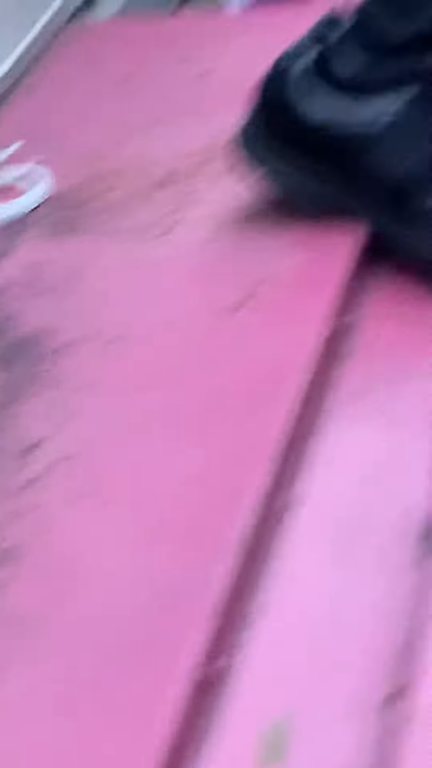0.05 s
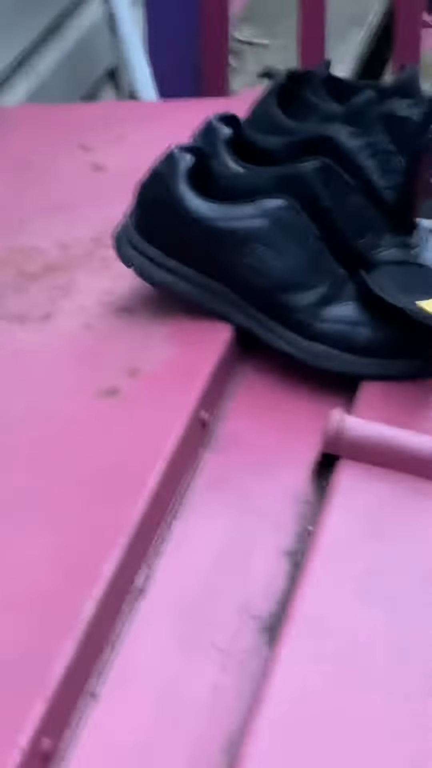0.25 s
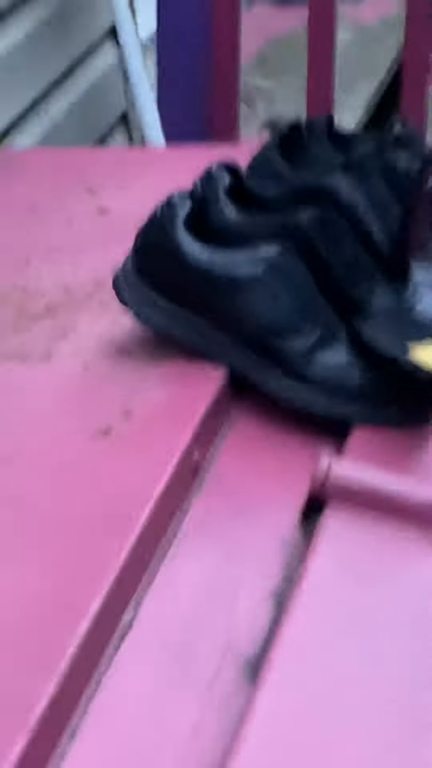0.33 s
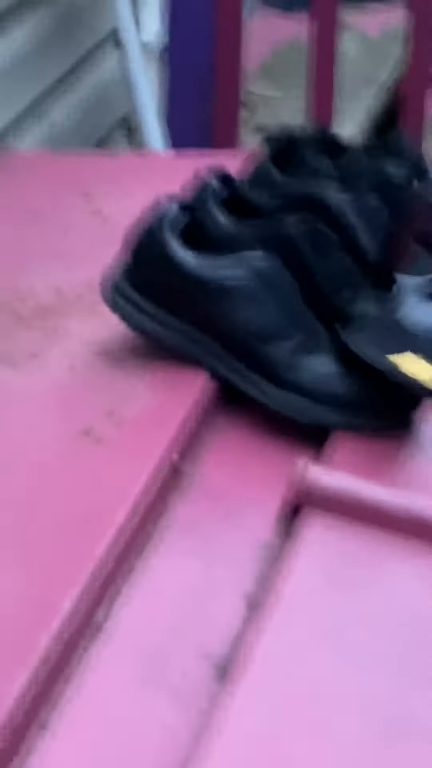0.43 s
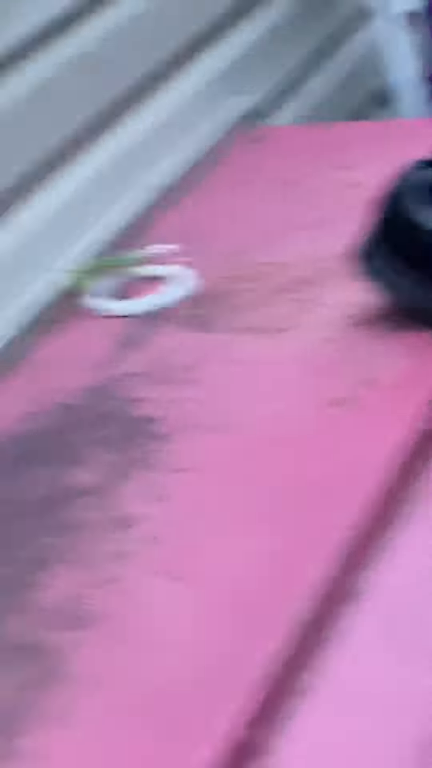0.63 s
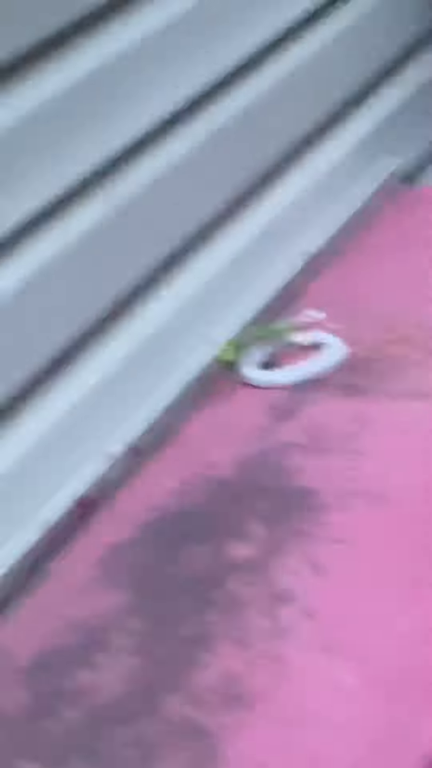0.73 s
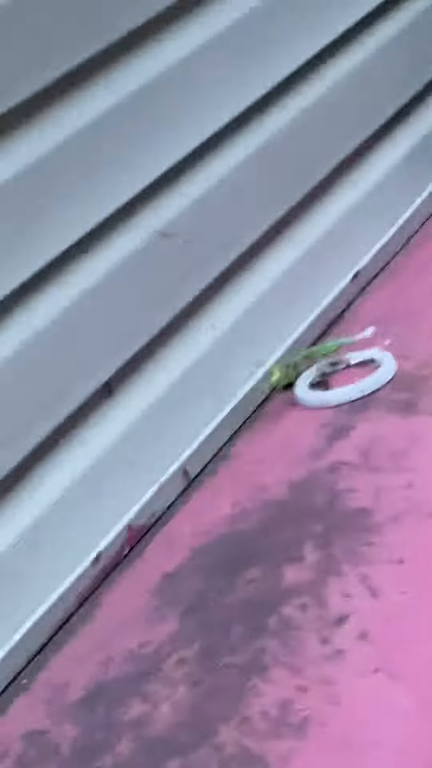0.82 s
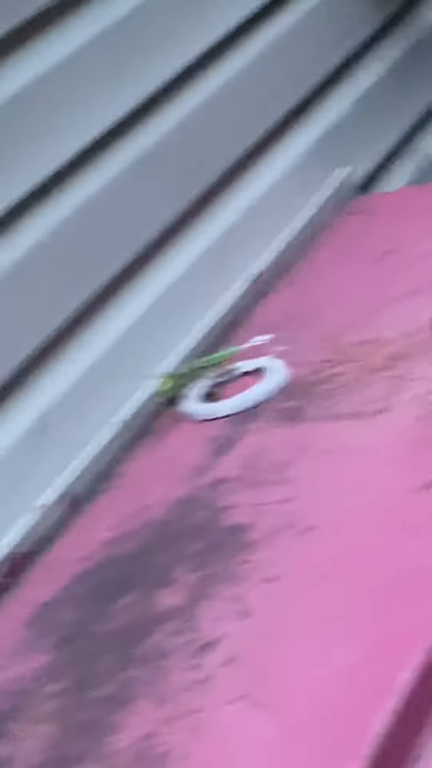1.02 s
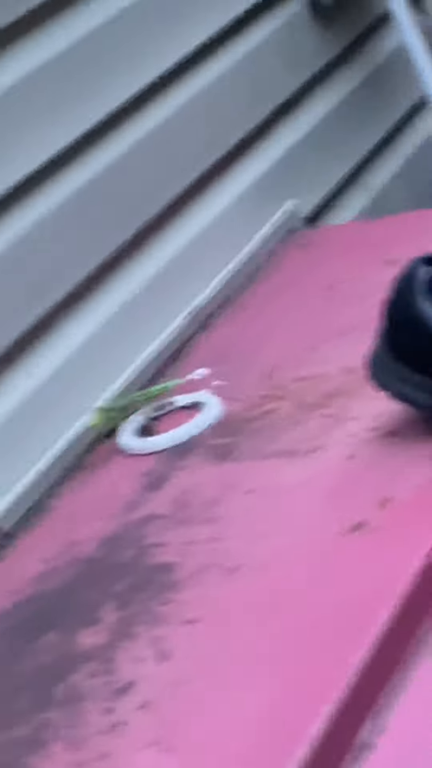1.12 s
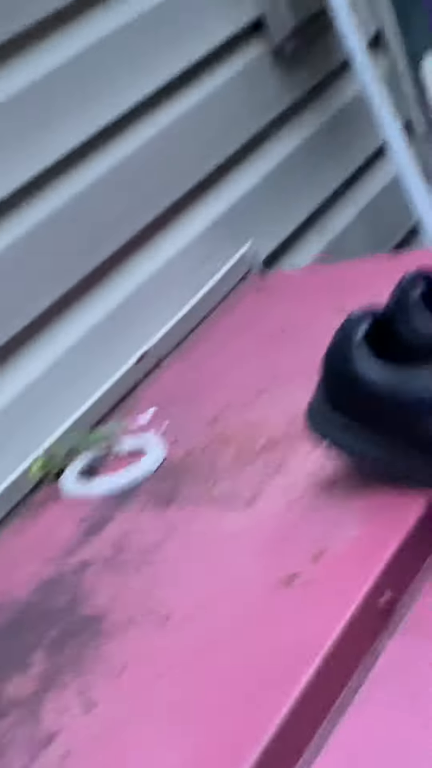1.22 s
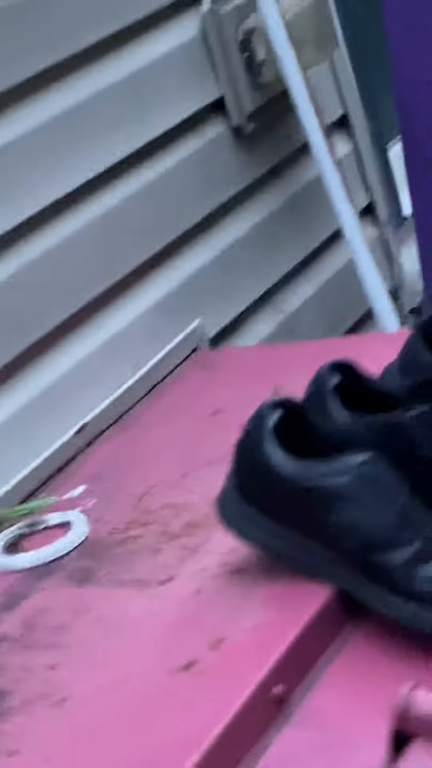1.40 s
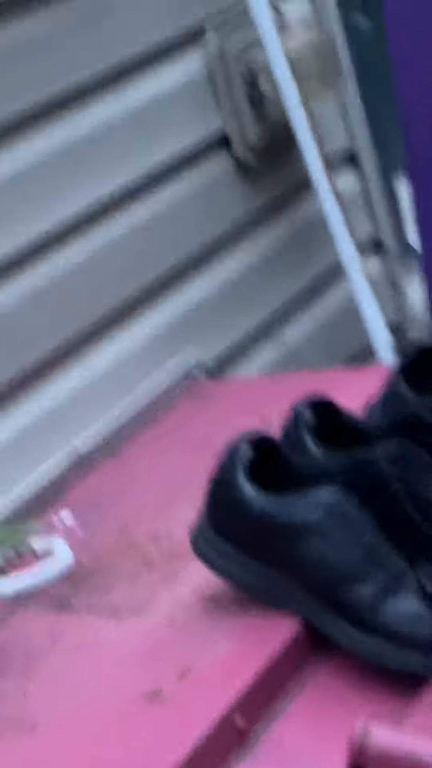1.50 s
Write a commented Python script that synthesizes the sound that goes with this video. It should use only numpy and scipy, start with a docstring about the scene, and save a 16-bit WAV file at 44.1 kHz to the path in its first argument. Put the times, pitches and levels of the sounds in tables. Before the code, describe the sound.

Camera handling thumps and a short finger rub, over a faint outdoor insect hiss.

```python
"""Handling a small camera outdoors

A hand shifts its grip: a few hollow knocks and a short rub travel through the case to the microphone.
Each impact gives a dull pock, a bright click, a brief ring and a low wobble of the whole body.
The fingers rub by stick-slip friction, scuff, and judder to a stop; the moving camera is softly buffeted.
Behind it are a faint hiss of insects, thin outdoor air and a distant rumble."""
import sys
import numpy as np
from scipy import signal
from scipy.fft import rfft, irfft
from scipy.io import wavfile

SR = 44100
rng = np.random.default_rng(int(sys.argv[2]) if len(sys.argv) > 2 else 0)


def wav_out(sig):
    """Save sig, one row per channel (or a flat mono array), as 16-bit PCM at SR to the path in sys.argv[1]."""
    wavfile.write(sys.argv[1], SR, np.round(np.clip(np.atleast_2d(sig).T, -1, 1) * 32767).astype(np.int16))


N = 68355

# distant rumble: frequency_hz, relative_db
RUMBLE_SPECTRUM = [(20, -40.5), (50, -5), (90, 1), (130, -3.5), (185, 1.5), (260, -11), (380, -18.5),
                   (800, -48.5), (4000, -70)]
# outdoor air: frequency_hz, relative_db
AIR_SPECTRUM = [(60, -7), (400, -6.5), (1000, 1.5), (1800, 0.5), (2600, -2.5), (3800, -5.5), (6300, -2),
                (8000, -19), (12000, -31.5)]
# rise and fall of the air: time_s, level_db
AIR_ENVELOPE = [(0, -65.5), (.55, -62.5), (.68, -61), (.87, -63.5), (.97, -62.5), (1.08, -66.5),
                (1.33, -67.5), (1.38, -61.5), (1.55, -62.5)]
# fizz in the top treble: frequency_hz, relative_db
FIZZ_SPECTRUM = [(3000, -42), (6000, -7), (8000, 6), (10000, 3), (12300, -1), (14000, -5.5), (15200, -14),
                 (15700, -19.5)]
# rise and fall of the fizz: time_s, relative_db
FIZZ_ENVELOPE = [(0.0, -83), (0.102, -77.5), (0.146, -71), (0.272, -75.5), (0.378, -71.5), (0.392, -67.5),
                 (0.4, -71), (0.47, -68), (0.586, -75), (0.79, -66.5), (0.872, -73.5), (1.308, -79.5),
                 (1.416, -67), (1.55, -73.5)]
# insect chorus: frequency_hz, relative_db
INSECT_SPECTRUM = [(2000, -63), (4000, -33.5), (4900, -12.5), (5600, -6), (5880, 4.5), (6100, -4.5),
                   (6650, -1.5), (7300, -23.5), (8200, -25.5), (11000, -48)]
# rise and fall of the chorus: time_s, level_db
INSECT_ENVELOPE = [(0, -55.5), (.11, -55.5), (.16, -59), (.75, -58), (1.25, -58), (1.55, -57.5)]
# phase of distant sound between the microphone ports: frequency_hz, left_lead_rad
PORT_PHASE_LEAD = [(0, 0), (700, -.15), (1400, -.6), (2400, .5), (3200, 0), (5000, .25), (6000, 1.6),
                   (7400, 3.1), (8600, 4.3), (10200, 6.2), (11200, 6.5), (12200, 8.1), (13500, 9.4),
                   (15500, 10.4)]
# buffeting of the moving camera: frequency_hz, relative_db
BUFFET_SPECTRUM = [(20, -34), (45, -7.5), (80, -3.5), (140, -6.5), (250, -19), (600, -52), (2000, -91.5)]
# strength of the buffeting: time_s, level_db
BUFFET_ENVELOPE = [(0, -49.5), (.12, -75.5), (.18, -59.5), (.28, -40.5), (.36, -57), (.43, -37.5),
                   (.53, -34.5), (.58, -54), (.66, -58), (.84, -54.5), (1.05, -70), (1.55, -68.5)]
# friction of the fingers: time_s, level_db
RUB_ENVELOPE = [(0, -61), (.04, -64), (.06, -52), (.11, -68.5), (.128, -58), (.14, -28), (.16, -36.5),
                (.185, -44.5), (.24, -39.5), (.275, -44), (.32, -51.5), (.365, -53.5), (.41, -44.5),
                (.435, -43), (.46, -38), (.495, -32.5), (.515, -21), (.535, -65), (.6, -74), (.68, -76.5),
                (.86, -75), (.96, -67.5), (1.06, -84.5), (1.34, -90), (1.385, -72), (1.44, -98)]
# a soft blow through the case: frequency_hz, relative_db
POCK_SPECTRUM = [(30, -38), (130, -16.5), (210, -15.5), (310, -8), (430, -2), (560, 1), (680, -5.5),
                 (850, -14.5), (1000, -34), (1600, -41.5), (2500, -60.5), (4000, -75.5), (9000, -91)]
# a hard contact: frequency_hz, relative_db
CLICK_SPECTRUM = [(40, -28), (400, -11), (800, 12), (1500, 1.5), (1900, -7), (3300, -14.5), (4200, -26),
                  (5600, -12.5), (7200, -43.5), (9000, -41.5), (11500, -60.5), (15000, -80.5)]
# knocks on the case: start_s, pock_db, click_db, ring_db, wobble_db
IMPACTS = [(.0505, -41.5, -47.5, -76.5, -67.5), (0.1438, -2, -50.5, -35.5, -48),
           (0.1501, -1, -33, -36.5, -34), (0.1725, -35, -61.5, -61, -34.5), (0.1923, -23, -30.5, -58, -56),
           (0.2182, -43, -58, -53, -60), (0.232, -31.5, -58, -59.5, -55), (0.2484, -49.5, -51, -34.5, -49),
           (0.2516, -16.5, -26.5, -55, -46), (0.2579, -20, -40, -54, -43.5),
           (.3850, -14.5, -58.5, -43, -61.5), (0.3904, -1.5, -11, -16, -28.5),
           (.3920, -11.5, -48, -29.5, -42), (0.3969, -19, -44.5, -36, -34.5),
           (.4160, -24.5, -46.5, -35.5, -46), (.4548, -25.5, -63, -49, -66.5), (0.477, -31, -61, -67, -48),
           (0.4962, -28.5, -51, -55, -57), (.5122, -24.5, -42, -23, -20), (.5690, -45.5, -69.5, -58, -51),
           (.6550, -60, -53.5, -54.5, -62), (.6970, -56.5, -59.5, -59, -71), (.7260, -61, -54, -59, -61)]
# resonances of the case: pitch_hz, relative_db, t60_s
RING_MODES = [(505, -20, .04), (810, -18.5, .018), (1022, -8.5, 0.044), (1400, -24.5, .014),
              (1545, -2, .017), (3300, -40, 0.039)]
# dry scuffs of skin: centre_s, half_width_s, level_db
SCUFF_STROKES = [(0.25, 0.0038, -54), (0.45, 0.0091, -49.5), (0.476, 0.017, -50), (0.5141, .007, -36.5)]
# sliding skin: frequency_hz, relative_db
SCUFF_SPECTRUM = [(200, -24.5), (1000, 8), (1700, 1.5), (2500, -13.5), (3400, -8), (4300, -15),
                  (5700, -6.5), (7200, -26.5), (9800, -23.5), (13000, -50.5)]

RUMBLE_DB, FIZZ_GAIN_DB = -58, 2.5
CRICKET_HZ, CRICKET_SKIRT_HZ, CRICKET_DB = 2210, 186, -72.5
SLIPS_PER_S, SLIP_SPREAD_DB, RUB_GRIT_DB = 900, 5, -13.5
POCK_DELAY_S, POCK_SKEW = .0019, .12  # the push comes just after contact and ebbs slower than it swells
HARD_PAN_DB = [[3], [-3]]  # left, right: hard contact is nearer the left port
WOBBLE_HZ, WOBBLE_T60_S, WOBBLE_RISE_S = 80, .11, .006
JUDDER_CENTRE_S, JUDDER_HALF_WIDTH_S, JUDDER_JITTER_S = .510, .007, .00014
JUDDER_HZ, JUDDER_GLIDE_HZ_PER_S = 508, 1800
JUDDER_POCK_DB, JUDDER_CLICK_DB, JUDDER_RING_DB = -18, -29, -35
SCATTER_DB, SCATTER_T60_S, SCATTER_LOW_HZ, SCATTER_DELAY_S = -14, .019, 200, .004
CEILING, CUTOFF_HZ = .98, 15700


def amp(db):
    """Amplitude grows tenfold for every 20 dB."""
    return 10 ** (np.asarray(db) / 20)


def unit(x):
    """Normalisation to an rms of one."""
    return x / np.sqrt(np.mean(x ** 2) + 1e-20)


def colour(points, hz):
    """Interpolation on a log-frequency axis."""
    frequencies, values = np.transpose(points)
    return np.interp(np.log(hz + 1), np.log(frequencies + 1), values)


def level(points):
    """Amplitude envelope, linear in decibels between points."""
    return amp(np.interp(np.arange(N) / SR, *np.transpose(points)))


def response(points, skew=1, size=4096):
    """Centred impulse response of a spectrum, peak one; skew 0 is symmetric, 1 is minimum phase."""
    log_gain = np.log(amp(colour(points, abs(np.fft.fftfreq(size, 1 / SR)))))
    phase = -skew * signal.hilbert(log_gain).imag
    pulse = np.fft.fftshift(np.fft.ifft(np.exp(log_gain + 1j * phase)).real)
    return pulse / abs(pulse).max()


def through(x, impulse_response, start=0):
    """Convolution with an impulse response whose time zero is at sample start."""
    return signal.fftconvolve(x, impulse_response)[start:start + N]


def noise(points, correlation):
    """Spectrally shaped stereo noise; the balance of mid and side sets the left-right correlation."""
    gain = amp(colour(points, np.fft.rfftfreq(N, 1 / SR)))
    mid, side = irfft(rfft(rng.standard_normal((2, N))) * gain, N)
    mid, side = mid * np.sqrt(1 + correlation), side * np.sqrt(1 - correlation)
    return unit(np.array([mid + side, mid - side]))


def flutter(depth_db, hz):
    """Random amplitude modulation of a given rms depth and bandwidth."""
    low_pass = np.exp(-(np.fft.rfftfreq(N, 1 / SR) / hz) ** 2)
    drift = irfft(rfft(rng.standard_normal(N)) * low_pass, N)
    return amp(depth_db * unit(drift))


def outdoors():
    """Independent noises add in power: distant rumble, thin air and a faint fizz on top."""
    rumble = amp(RUMBLE_DB) * noise(RUMBLE_SPECTRUM, correlation=1)
    air = level(AIR_ENVELOPE) * noise(AIR_SPECTRUM, correlation=.87) * flutter(depth_db=1, hz=60.03)
    fizz = level(FIZZ_ENVELOPE) * noise(FIZZ_SPECTRUM, correlation=.93) * flutter(depth_db=1.56, hz=90)
    return rumble + air + amp(FIZZ_GAIN_DB) * fizz


def insects():
    """Incoherent calls merge into a high band of noise; a cricket adds a faint, narrow band below."""
    chorus = noise(INSECT_SPECTRUM, correlation=1) * flutter(depth_db=.82, hz=50)
    band = [(CRICKET_HZ / 2, -80), (CRICKET_HZ - CRICKET_SKIRT_HZ, -22), (CRICKET_HZ, 0),
            (CRICKET_HZ + CRICKET_SKIRT_HZ, -22), (CRICKET_HZ * 2, -80)]
    cricket = noise(band, correlation=.8) * flutter(depth_db=.6, hz=45)
    return level(INSECT_ENVELOPE) * chorus + amp(CRICKET_DB) * cricket


def buffeting():
    """Motion of the camera buffets it with low pressure fluctuations, in phase at both ports."""
    return level(BUFFET_ENVELOPE) * noise(BUFFET_SPECTRUM, correlation=1)


def rub():
    """Stick-slip friction of skin drives the case with a dense, random train of tiny blows."""
    strengths = rng.choice([-1, 1], N) * amp(SLIP_SPREAD_DB * rng.standard_normal(N))
    slips = strengths * (rng.random(N) < SLIPS_PER_S / SR)
    return level(RUB_ENVELOPE) * (unit(pock(slips)) + amp(RUB_GRIT_DB) * unit(click(slips)))


def pock(blows):
    """A soft blow spreads its force over time, so its push and rebound carry little treble."""
    pulse = signal.hilbert(response(POCK_SPECTRUM, POCK_SKEW)).imag  # quadrature gives two opposed lobes
    return through(blows, pulse / abs(pulse).max(), len(pulse) // 2 - round(POCK_DELAY_S * SR))


def click(blows):
    """A hard contact starts abruptly, so its spectrum is broad."""
    pulse = response(CLICK_SPECTRUM)
    return through(blows, pulse, len(pulse) // 2)


def knocks():
    """Impulse excitation: each knock pushes, clicks, rings and shakes the case at once."""
    blows = np.zeros((4, N))
    for start_s, *levels_db in IMPACTS:
        blows[:, round(start_s * SR)] += amp(levels_db)
    pocks, clicks, rings, wobbles = blows
    hard = (click(clicks) + ring(rings)) * amp(HARD_PAN_DB)
    return pock(pocks) + hard + wobble(wobbles)


def ring(blows):
    """Free vibration of the case is a sum of exponentially damped modes."""
    t = np.arange(SR // 4) / SR
    modes = sum(amp(db - 60 * t / t60) * np.sin(2 * np.pi * hz * t) for hz, db, t60 in RING_MODES)
    return through(blows, modes)


def wobble(blows):
    """The whole camera bounces in the hand as a damped mass on a spring."""
    t = np.arange(SR // 4) / SR
    envelope = (1 - np.exp(-t / WOBBLE_RISE_S)) * amp(-60 * t / WOBBLE_T60_S)
    return through(blows, envelope * np.sin(2 * np.pi * WOBBLE_HZ * t))


def scuffs():
    """Friction noise swells into brief, grainy swishes where a finger slides faster."""
    t = np.arange(N) / SR
    strokes = sum(amp(db) * np.exp(-((t - centre) / width) ** 2) for centre, width, db in SCUFF_STROKES)
    return strokes * noise(SCUFF_SPECTRUM, correlation=.94) * flutter(depth_db=.5, hz=497)


def judder():
    """Nearly periodic stick-slip at a rising rate makes a short, hollow creak as the finger stops."""
    t = np.arange(N) / SR - JUDDER_CENTRE_S
    sliding_s = np.clip(t, -2 * JUDDER_HALF_WIDTH_S, 2 * JUDDER_HALF_WIDTH_S)
    cycles = JUDDER_HZ * sliding_s + .5 * JUDDER_GLIDE_HZ_PER_S * sliding_s ** 2
    onsets = np.flatnonzero(np.diff(np.floor(cycles)))  # one slip per cycle
    onsets += np.round(JUDDER_JITTER_S * SR * rng.standard_normal(64)[:len(onsets)]).astype(int)
    slips = np.zeros(N)
    slips[onsets] = np.exp(-(t[onsets] / JUDDER_HALF_WIDTH_S) ** 2)
    hard = amp(JUDDER_CLICK_DB) * click(slips) + amp(JUDDER_RING_DB) * ring(slips)
    return amp(JUDDER_POCK_DB) * pock(slips) + hard * amp(HARD_PAN_DB)


def case_scatter(x):
    """Vibration scatters through the case and, a little later, rocks the two ports in antiphase."""
    t = np.arange(SR // 10) / SR - SCATTER_DELAY_S
    paths = rng.standard_normal(len(t)) * amp(-60 * abs(t) / SCATTER_T60_S) * (t > 0)
    high_pass = signal.butter(1, SCATTER_LOW_HZ, "high", fs=SR, output="sos")
    rocking = through(signal.sosfilt(high_pass, x.mean(0)), paths / np.linalg.norm(paths))
    return x + np.outer([1, -1], amp(SCATTER_DB) * rocking)


def path_difference(x):
    """Sound reaches one port first, giving a phase difference that depends on frequency."""
    phase = colour(PORT_PHASE_LEAD, np.fft.rfftfreq(N, 1 / SR))
    return irfft(rfft(x) * np.exp(.5j * np.outer([1, -1], phase)), N)


def scene():
    """Superposition of buffeting, structure-borne handling noise and airborne sound."""
    buffet = buffeting()
    structure_borne = case_scatter(knocks() + rub() + judder())
    airborne = path_difference(scuffs() + insects() + outdoors())
    return buffet + structure_borne + airborne


def record(dry):
    """Soft saturation rounds the highest peaks, then a low-pass filter limits the band."""
    rounded = dry / (1 + (dry / CEILING) ** 12) ** (1 / 12)
    low_pass = signal.firwin(511, CUTOFF_HZ, window=("kaiser", 9), fs=SR)
    return signal.oaconvolve(rounded, low_pass[None], "same")


dry = scene()
out = record(dry)
wav_out(out)
```